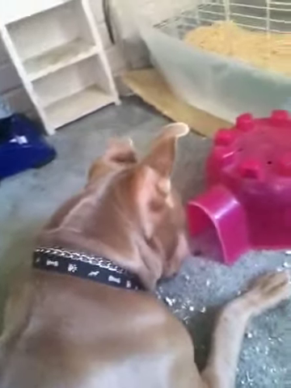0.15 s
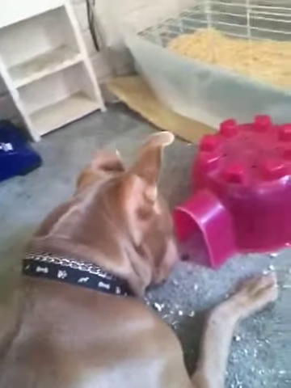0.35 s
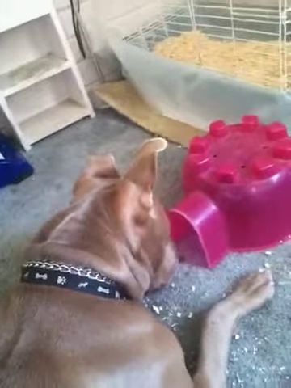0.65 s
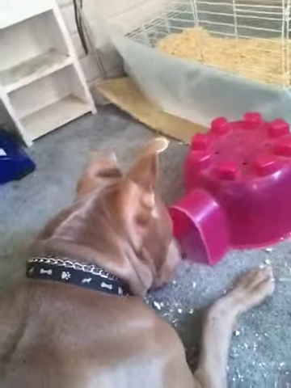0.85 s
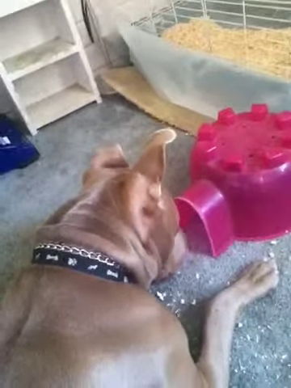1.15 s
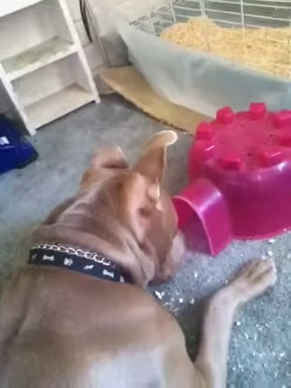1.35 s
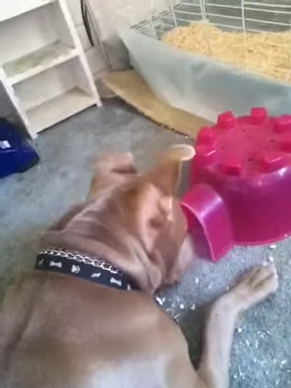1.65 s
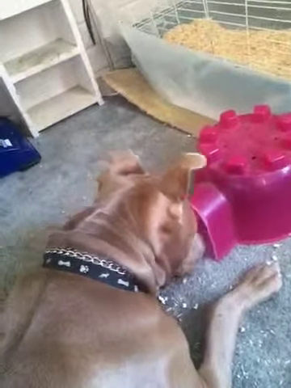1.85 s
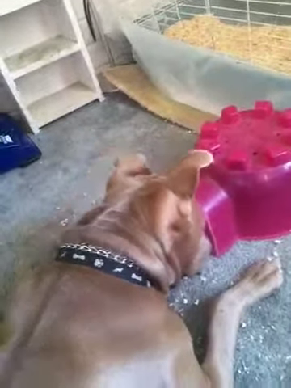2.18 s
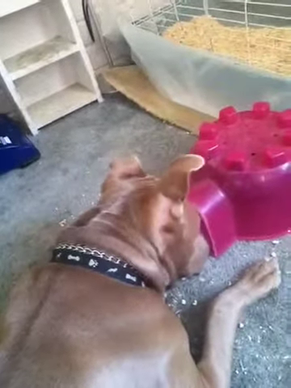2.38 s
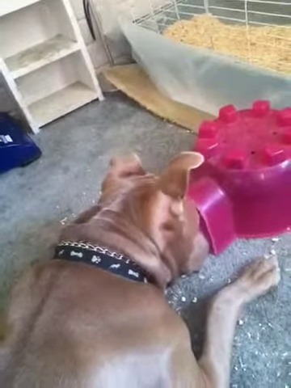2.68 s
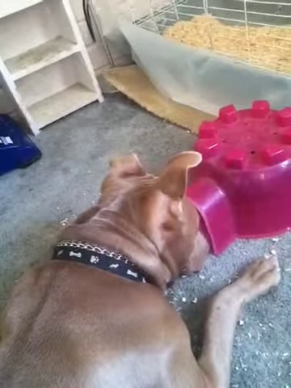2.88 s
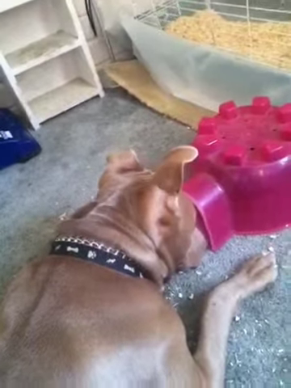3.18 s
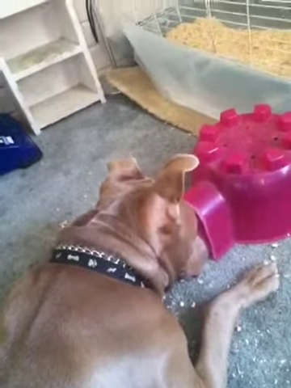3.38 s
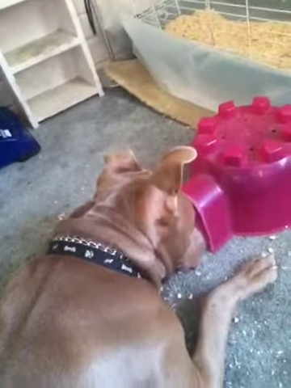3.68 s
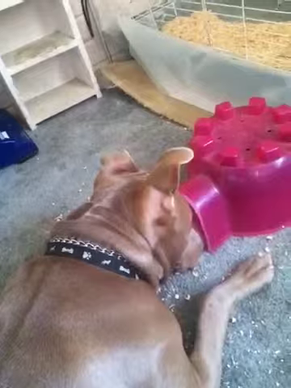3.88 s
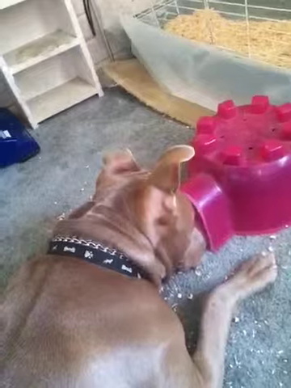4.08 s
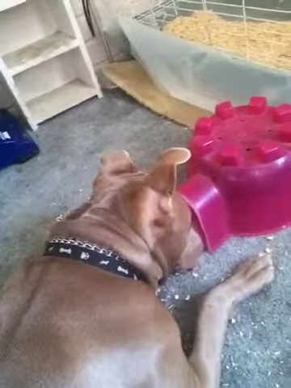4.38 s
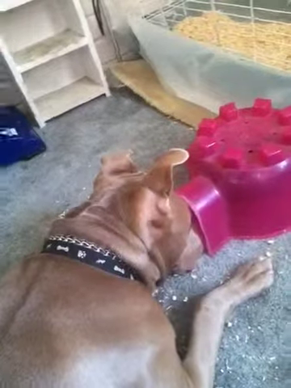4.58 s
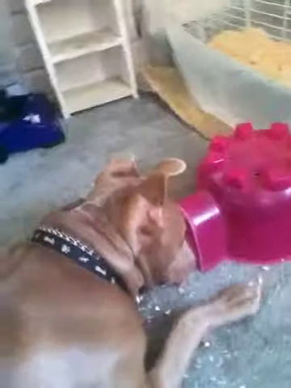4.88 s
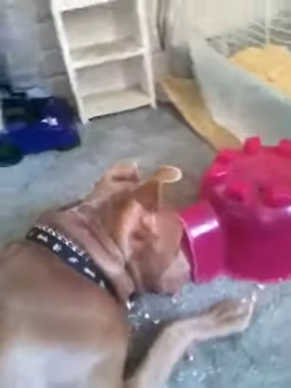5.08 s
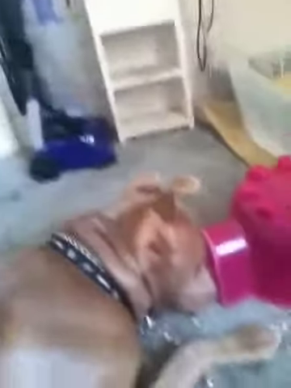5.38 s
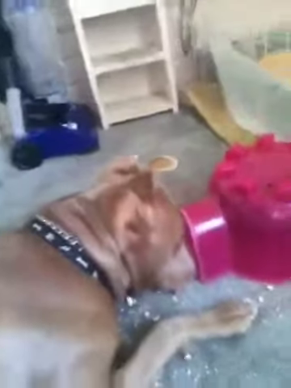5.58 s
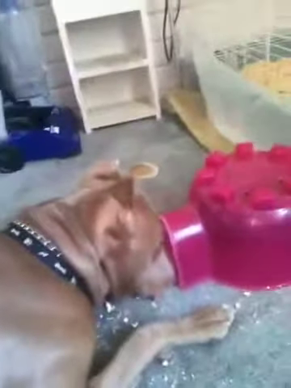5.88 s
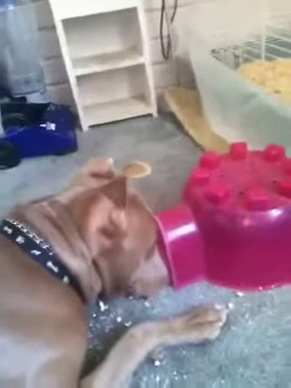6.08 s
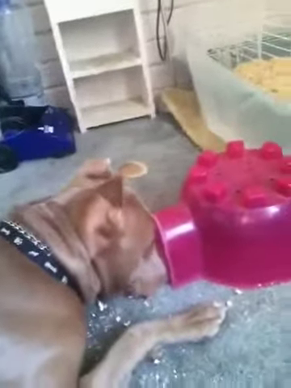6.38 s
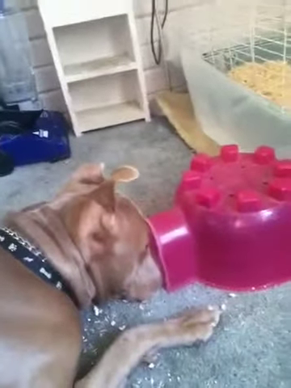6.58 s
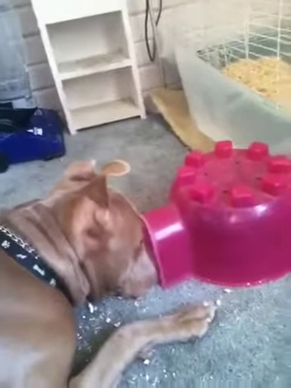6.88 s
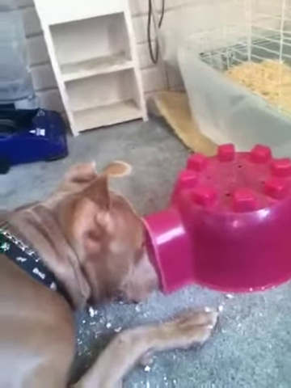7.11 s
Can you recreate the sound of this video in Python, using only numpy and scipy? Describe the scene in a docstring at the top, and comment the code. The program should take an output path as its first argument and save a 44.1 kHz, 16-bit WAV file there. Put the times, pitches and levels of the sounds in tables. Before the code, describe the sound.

A low electrical hum pulses about twice a second under soft fan rush. Over it, a small rodent squeaks in brief clusters roughly every second or so: thin openings fall to fuller, fluttering notes, then rough croaks and chirps. One raspy shriek comes near the start, and close floor scuffs near the end. Indoors, hard walls smear the calls; the shuffling is nearer the microphone.

```python
"""Thin guinea-pig whistles slide down in pitch and turn hoarse over a throbbing hum, in a small hard room.
The calls are near-pure tones with an octave above; flapping tissue and hissing air roughen them.
One harsh two-push shriek adds a shaky tone wrapped in noise, and the walls smear every call.
The appliance is a stack of hum lines, wavering fan tones and coloured noise, sounding throughout.
Late on, someone shifts on the floor: short bursts of coloured noise make ticks, knocks and scuffs."""
import sys
import numpy as np
from scipy import signal
from scipy.fft import rfft, irfft, next_fast_len
from scipy.io import wavfile
from scipy.ndimage import map_coordinates

SR = 44100
rng = np.random.default_rng(int(sys.argv[2]) if len(sys.argv) > 2 else 0)


def master(y):
    """Save y as 16-bit WAV."""
    cut = np.clip(np.atleast_2d(y).T, -1, 1)
    pcm = np.round(cut * 32767)  # scale
    wavfile.write(sys.argv[1], SR, pcm.astype(np.int16))


N = 319715
T = np.arange(N) / SR  # time [s]


def undb(db):
    """Decibels to gain."""
    return 10 ** (np.asarray(db) / 20)


def unit(x):
    """Scale to rms 1."""
    return x / np.sqrt(np.mean(x ** 2) + 1e-20)


def colour(x, points):
    """Filter by a spectrum of (frequency [Hz], level [dB]) points, joined on a log-frequency axis."""
    hz, db = np.transpose(points)
    size = next_fast_len(len(x))
    f = np.maximum(np.fft.rfftfreq(size, 1 / SR), 1)
    gain = undb(np.interp(np.log(f), np.log(hz), db))
    return irfft(rfft(x, size) * gain, size)[:len(x)]


def noise(points, size):
    """Noise of rms 1 with a spectrum of (frequency [Hz], level [dB]) points."""
    return unit(colour(rng.standard_normal(size), points))


def wander(rate, size):
    """Smooth chance of spread near 1, with a new random value rate times a second."""
    place = np.arange(size) * rate / SR
    return map_coordinates(rng.standard_normal(size // 4 + 8), [place], order=3, mode="mirror")


def add(out, start_s, x):
    """Mix a sound in at its time."""
    i = int(start_s * SR)
    x = x[:max(N - i, 0)]
    out[i:i + len(x)] += x


def swell(size, edge):
    """A gate whose rounded edges take up the given share of its length."""
    return signal.windows.tukey(size, min(edge, 1))


def appliance(hum_waver_db=1.0, rush_db=-55.0, air_db=-58, closer_db=1):
    """Throbbing mains hum over a fan; moving through the room's standing waves changes the mix of its lines."""
    # mains hum: (frequency [Hz], level at first [dB], level after the listener has moved [dB],
    # change at each throb [dB])
    hum = [(120, -54.5, -53, -9), (240, -53.5, -54.5, -4.5), (360, -60, -58, 2.5), (480, -68, -56, 1.5),
           (600, -66.5, -73, -5.5)]
    # wavering tones of the fan: (frequency [Hz], waver rate [1/s], level [dB])
    fan = [(87.5, 7.2, -70), (136.2, 24, -63), (316.3, 9, -65.5)]
    # broad airy noise: (frequency [Hz], level [dB])
    air = [(400, -23), (700, -0.5), (1100, -5.5), (1760, -13.5), (3200, -16), (4400, -25), (7000, -26),
           (10000, -34.5), (15000, -58)]
    # the fan's low rush: (frequency [Hz], level [dB])
    rush = [(25, -19), (65, -14.5), (100, -15), (190, 9.5), (400, 7), (650, 2), (800, -34)]
    move_start_s, move_end_s = 4.53, 5.97
    throb_hz, throb_peak_s, throb_narrow = 1.91, 0.713, 3.6  # rate, time of one throb, narrowness

    moved = np.interp(T, (move_start_s, move_end_s), (0, 1))
    drift_s = 0.0023 * wander(5.5, N) / 120  # slight timing drift shared by the hum lines
    out = undb(rush_db) * noise(rush, N) + undb(air_db) * noise(air, N)
    out *= undb(closer_db * (moved - 1.0))  # the noise reaches its set level once the listener has moved

    throb = np.abs(np.cos(np.pi * throb_hz * (T - throb_peak_s))) ** (2 * throb_narrow)
    for hz, first_db, later_db, throb_db in hum:
        db = first_db + (later_db - first_db) * moved
        db += throb_db * throb + hum_waver_db * wander(3.835, N)
        cycles = hz * (T + drift_s) + rng.random()
        out += np.sqrt(2) * undb(db) * np.sin(2 * np.pi * cycles)

    for hz, waver_per_s, db in fan:
        # two independent wavers a quarter cycle apart blur the tone into a narrow band
        sine = wander(waver_per_s, N) * np.sin(2 * np.pi * hz * T)
        cosine = wander(waver_per_s, N) * np.cos(2 * np.pi * hz * T)
        out += undb(db) * (sine + cosine)
    return out


def whistle(hz, hoarse, octave_db, flap_hz=560, hiss_db=-8):
    """A near-pure tone; when hoarse, its pitch sags in fits, flapping tissue adds sidebands and air hisses."""
    hiss_colour = [(700, -17.5), (1500, -4.5), (2300, -17.0), (3500, 12.5),
                   (4600, -17.0), (8500, -19.5), (13000, -31)]
    n, hoarse = len(hz), np.clip(hoarse, 0, 1)
    shake = .17 * np.minimum(hoarse, .25)
    flap = np.sin(2 * np.pi * np.cumsum(flap_hz * (1 + .4 * wander(400, n))) / SR)
    sag = .6 - np.abs(wander(220, n))
    # the pitch is lowest while the gap is widest, so the lower sideband is the stronger one
    phase = 2 * np.pi * np.cumsum(hz * (1 + shake * (2 * sag - flap))) / SR
    tone = np.sin(phase) + undb(octave_db) * np.sin(2 * phase)
    hiss = undb(hiss_db) * hoarse * noise(hiss_colour, n)
    return unit(tone * (1 + np.sqrt(hoarse) * flap) + hiss)


def squeak(length, slide_s, glide_s, opening_hz, low_hz, rebound_s, rebound_hz, db, fade, quaver,
           octave_db, thin_db):
    """A thin high whistle slides down onto a fuller, fluttering note, rebounds once, then fades and sags."""
    # air rushing with the note: (frequency [Hz], level [dB])
    breath_colour = [(2000, -19.5), (3200, -3), (4700, 3), (7000, -3), (9000, -4.5), (12000, -14),
                     (15000, -31)]
    breath_db = -31.5  # relative to the tone
    attack_s, release_s, rebound_half_s = .022, .02, 0.01602
    release_sag = 0.112  # the pitch sags by this share as the breath ends
    break_quaver, quaver_per_s = .018, 450  # extra share of pitch while it breaks downward; rate
    quaver_lean = .25  # leaning of the quaver towards upward leaps
    flutter, flutter_per_s = .3, 400  # depth and rate in loudness
    held_hoarse, break_hoarse = 0.011, 0.031

    t = T[:int(length * SR)]
    landed = 1 / (1 + np.exp((slide_s - t) / glide_s))  # 0 on the opening note, 1 on the low one
    breaking = np.sin(np.pi * landed)  # greatest in mid-slide
    release = np.clip(1 - (length - t) / release_s, 0, 1)

    hz = opening_hz + (low_hz - opening_hz) * landed
    hz += rebound_hz * np.exp(-((t - rebound_s) / rebound_half_s) ** 2)
    shake = quaver * landed + break_quaver * breaking
    chance = wander(quaver_per_s, len(t))
    leaps = shake * (chance + quaver_lean * (chance ** 2 - 1))
    hz = np.minimum(hz * (1 + leaps), opening_hz)  # the opening is the highest note
    hz *= 1 - release_sag * release

    level_db = db + thin_db * (1 - landed) ** 2 - fade * np.maximum(t - slide_s, 0)
    gate = np.minimum(t / attack_s, 1) * np.sqrt(1 - release)
    gate *= 1 + flutter * landed * wander(flutter_per_s, len(t))
    tone = whistle(hz, held_hoarse * landed + break_hoarse * breaking, octave_db)
    breath = undb(breath_db) * landed * noise(breath_colour, len(t))
    return (tone + breath) * undb(level_db) * gate


def peep(length, first_hz, last_hz, db, hoarse, octave_db):
    """One short glide with soft edges; the hoarser it is, up to a limit, the more its pitch trembles."""
    most, full_at_hoarse, per_s = .045, .3, 800  # greatest share of pitch, hoarseness there, rate
    n = int(length * SR)
    gate = swell(n, .5)
    tremble = most * np.clip(hoarse / full_at_hoarse, 0, 1) * wander(per_s, n)
    hz = np.linspace(first_hz, last_hz, n) * (1 + tremble)
    return whistle(hz, hoarse, octave_db) * undb(db) * gate


def shriek(rasp_db=-4):
    """A strained, shaky cry whose octave outgrows its fundamental as it gets louder, wrapped in rasp."""
    # the two pushes: (time [s], length [s], pitch [Hz], peak level [dB])
    pushes = [(0.744, 0.076, 3213, -38), (0.815, 0.072, 3520, -30.5)]
    # rasp colour: (frequency [Hz], level [dB])
    rasp_colour = [(700, -61), (1800, -9), (3200, -11), (4000, -50), (4600, -13), (5600, -6), (7000, -4),
                   (8500, -10), (10500, -16.5), (12500, -31), (15000, -50)]
    edge_db, peak_share = -6.5, 0.38  # level at both ends of a push; share of its length at the peak
    scoop, scoop_s = .12, 0.01326  # each push starts flat by this share and rises to its pitch
    octave_equal_db = -35.5  # level at which the octave about equals the fundamental
    octave_growth = 1.3  # dB the octave gains on the fundamental per dB of level

    out = np.zeros(N)
    for start_s, length, pitch_hz, peak_db in pushes:
        n = int(length * SR)
        t = T[:n]
        hz = pitch_hz * (1 - scoop * np.exp(-t / scoop_s))
        db = peak_db + np.interp(t / length, (0, peak_share, 1), (edge_db, 0, edge_db))
        octave_db = octave_growth * (db - octave_equal_db)
        phase = 2 * np.pi * np.cumsum(hz * (1 + .032 * wander(1100, n))) / SR
        rattle = 1 + .9 * wander(1500, n)
        tone = rattle * np.sin(phase) + np.sqrt(2) * undb(octave_db) * np.sin(2 * phase)
        rasp = undb(rasp_db) * noise(rasp_colour, n)
        add(out, start_s, (tone + rasp) * undb(db) * swell(n, 0.035))
    return out


def croak(length, first_hz, last_hz, db, hoarse, octave_db):
    """As the breath runs out, a low note drops, fades and turns hoarse."""
    fade_db, bend = -11.5, 1.7  # level change by the end; how late the pitch gives way
    spent = np.linspace(0, 1, int(length * SR))
    hz = first_hz + (last_hz - first_hz) * spent ** bend
    tone = whistle(hz, hoarse * spent, octave_db)
    return tone * undb(db + fade_db * spent) * swell(len(hz), 0.18)


def airway_calls(croak_octave_db=-23, peep_octave_db=-27):
    """Long falling squeaks, closing croaks and short peeps, all coloured by the same airway."""
    # levels are those before the airway and the room
    # long squeaks: (time [s], length [s], slide after [s], slide time constant [s], opening pitch [Hz],
    # low pitch [Hz], rebound after [s], rebound [Hz], level [dB], fade [dB/s], quaver [share of pitch],
    # octave [dB], thin opening [dB])
    squeak_rows = [ (0.348, .105, 0.031, 0.011, 3595, 2642, 0.077, 301, -42, 145, 0.063, -35, -4),
                   (1.53, .112, .047, 0.00705, 4380, 2920, .095, 381, -26.5, 13, 0.063, -20.5, -13.5),
                   (2.976, 0.11, 0.033, 0.0083, 4397, 2900, .083, 169, -29, 147, 0.0814, -26, -14.5),
                   (4.439, .112, 0.03, 0.00795, 4130, 3055, 0.083, 372, -25.5, 103, 0.068, -25, -8),
                   (5.837, .13, .023, 0.0083, 4060, 2845, .085, 249.5, -34, 9, 0.038, -28.5, -17), ]
    # croaks that close a call: (time [s], length [s], first pitch [Hz], last pitch [Hz], level [dB],
    # final hoarseness [0-1, higher counts as 1])
    croak_rows = [ (1.419, 0.097, 2132, 1483, -43.5, 1), (2.506, 0.062, 2347, 1395, -39.5, 0.9),
                  (3.09, 0.048, 2580, 2023, -34.5, 0.8), (3.109, 0.034, 1515, 1130, -48.5, 1.1),
                  (3.898, 0.088, 2180, 1527, -44, 0.6), (4.056, 0.084, 2680, 2130, -42.5, 0.73),
                  (4.546, .036, 2550, 1646, -34.5, 0.97), (5.965, 0.026, 1920, 1370, -39, 1.2), ]
    # short peeps: (time [s], length [s], first pitch [Hz], last pitch [Hz], level [dB],
    # hoarseness [0-1, higher counts as 1])
    peep_rows = [ (0.456, 0.045, 2370, 2310, -58, 0.08), (0.492, 0.026, 3400, 3410, -54, 0.09),
                 (0.56, 0.019, 2210, 1870, -45, 1), (0.561, 0.022, 3800, 3680, -46, 0.5),
                 (0.593, 0.031, 4690, 4850, -54, 0.25), (0.629, 0.035, 2664, 2484, -47, 0.14),
                 (0.665, 0.025, 1860, 1665, -44.5, 0.15), (0.671, 0.042, 3600, 2880, -47, 1.1),
                 (1.336, 0.046, 2820, 3190, -47.5, 0.06), (1.379, 0.043, 3820, 3610, -49, 0.06),
                 (1.393, 0.055, 2485, 2986, -41, 0.12), (1.638, 0.048, 2710, 2260, -43, 0.04),
                 (1.692, 0.02, 1500, 1455, -48, 0.13), (1.8, 0.011, 1540, 1480, -50, 0.16),
                 (2.218, 0.043, 2850, 3260, -56.5, 0.2), (2.282, 0.048, 4400, 4160, -60, 0.28),
                 (2.296, 0.031, 2810, 2870, -51.5, 0.1), (2.319, 0.037, 1690, 2360, -51, 0.8),
                 (2.322, 0.035, 3500, 2890, -49, 1.1), (2.415, 0.076, 3010, 3076, -46, 0.18),
                 (2.418, 0.062, 6080, 6320, -54.5, 0.18), (2.435, 0.068, 2000, 2450, -48.5, 1),
                 (2.469, 0.053, 3770, 4154, -45.5, 0.19), (2.511, 0.047, 3500, 3000, -50, 1),
                 (2.953, 0.045, 2900, 2640, -47.5, 0.08), (3.22, 0.018, 4240, 4010, -59, 0),
                 (3.227, 0.036, 2804, 3255, -47, 0.55), (3.251, 0.028, 2370, 2240, -45.5, 0),
                 (3.805, 0.037, 2900, 3350, -53.5, 0.13), (3.847, 0.036, 4130, 3440, -42.5, 0.1),
                 (3.861, 0.0405, 2400, 2960, -35.5, 0.09), (3.984, 0.031, 3026, 3136, -42, 0.29),
                 (4.039, 0.021, 3610, 2930, -44, 0.3), (4.068, 0.023, 2500, 2590, -43, 0.11),
                 (4.479, .022, 1610, 1540, -48.5, 0.12), (4.533, 0.018, 2700, 2790, -32, 0.02),
                 (4.562, 0.015, 3124, 2970, -28, 0.2), (4.678, 0.03, 3526, 3430, -45.5, 0.1),
                 (4.695, 0.031, 2040, 2590, -49.5, 0.3), (4.75, 0.011, 2740, 2730, -40, 0.02),
                 (5.923, 0.047, 2700, 2220, -37.5, 0.04), (6.062, 0.054, 3257, 3850, -39, 0.18),
                 (6.082, 0.049, 1958, 2285, -44.5, 0.45), (6.137, 0.039, 3340, 2973, -35.5, 0.15),
                 (7.118, 0.032, 3140, 3000, -61, 0.1), (7.167, 0.017, 2880, 2400, -55.5, 0.33),
                 (7.19, 0.035, 2420, 2310, -54, 0.07), ]
    # the airway's passbands and the notch between them: (frequency [Hz], level [dB])
    throat = [(4100, -1.5), (4900, -4), (6000, -5), (8600, 7.5), (10500, -4.5)]

    out = np.zeros(N)
    for start_s, *row in squeak_rows:
        add(out, start_s, squeak(*row))
    for start_s, *row in croak_rows:
        add(out, start_s, croak(*row, croak_octave_db))
    for start_s, *row in peep_rows:
        add(out, start_s, peep(*row, peep_octave_db))
    return colour(out, throat)


def shuffling(grain_db=3):
    """Sharp ticks with a duller knock under them, and gritty scuffs on the hard floor."""
    # sharp ticks: (time [s], click level [dB], knock level [dB])
    ticks = [(5.1625, -40, -30.5), (5.2795, -35, -50), (5.594, -49, -43)]
    # scuffs: (time [s], length [s], level [dB], gritty band near 3 kHz relative to it [dB])
    scuffs = [(5.168, 0.061, -52, -11), (5.175, 0.049, -54.5, 3), (5.252, .1, -52.5, -21),
              (5.551, 0.12, -53, -13.5)]
    # colours of click, knock and scuff: (frequency [Hz], level [dB])
    click_colour = [(500, -11), (2000, 7.5), (4000, -12), (7000, 2), (10000, -7), (14000, -32)]
    knock_colour = [(150, -18), (500, 9), (1100, 10), (2100, 1), (3200, -13), (7000, -41)]
    scuff_colour = [(120, -15), (250, 14), (650, 1.5), (1150, 8.5), (1700, -3.5), (3200, -6.5), (4400, -21),
                    (5600, -7.5), (8500, -15), (13000, -45)]
    grit_colour = [(200, -25), (1500, -13), (2700, 6), (3800, -1), (4600, -42)]
    click_ring_s, knock_ring_s, knock_rise_s = .007, .025, .002  # each ring is the time to fall 60 dB

    out = np.zeros(N)
    t = T[:2048]
    for start_s, click_db, knock_db in ticks:
        click = noise(click_colour, len(t)) * undb(click_db - 60 * t / click_ring_s)
        knock = noise(knock_colour, len(t)) * undb(knock_db - 60 * t / knock_ring_s)
        knock *= np.minimum(t / knock_rise_s, 1)
        add(out, start_s, (click + knock) * swell(len(t), .01))

    for start_s, length, db, grit_db in scuffs:
        n = int(length * SR)
        grit = undb(grit_db) * noise(grit_colour, n)
        rub = noise(scuff_colour, n) + grit
        level_db = db + grain_db * wander(301, n)
        add(out, start_s, rub * undb(level_db) * swell(n, 0.11))
    return out


def room(x, early_db, tail_db, early_s=0.017):
    """Direct sound, a scatter of near echoes from floor and furniture, and a diffuse tail."""
    # the room's decay: (frequency [Hz], time to fall 60 dB [s])
    decay_points = [(250, 0.72), (1500, 0.28), (3000, 0.37), (7000, 0.3), (14000, 0.41)]
    t = T[:SR * 3 // 4]
    hz, t60 = np.transpose(decay_points)
    f = np.fft.rfftfreq(len(t), 1 / SR)
    white = rfft(rng.standard_normal(len(t)))

    tail = np.zeros(len(t))
    for share, decay_s in zip(np.eye(len(hz)), t60):  # overlapping bands, each with its own decay
        band = irfft(white * np.interp(f, hz, share), len(t))
        tail += band * undb(-60 * t / decay_s)
    tail *= np.minimum(t / 0.018, 1)

    early = rng.standard_normal(len(t)) * (rng.random(len(t)) < .02)  # sparse echoes
    early *= np.exp(-t / early_s) * (t > .002)

    response = (t == 0) + undb(early_db) * early / np.linalg.norm(early)
    response += undb(tail_db) * tail / np.linalg.norm(tail)
    return signal.fftconvolve(x, response / np.linalg.norm(response))[:N]


def scene():
    """The calls reach the microphone mostly by way of the room; the shuffling is nearer."""
    calls = room(airway_calls() + shriek(), early_db=0.5, tail_db=-2.5)
    near = room(shuffling(), early_db=-7, tail_db=-5)
    return (calls + near + appliance())[None]


def record(dry):
    """A steep elliptic low-pass cuts the treble above 15.6 kHz."""
    top_hz = 15600
    low_pass = signal.ellip(8, .2, 70, top_hz, fs=SR, output="sos")  # ripple and stopband [dB]
    return signal.sosfilt(low_pass, dry)


dry = scene()
out = record(dry)
master(out)
```